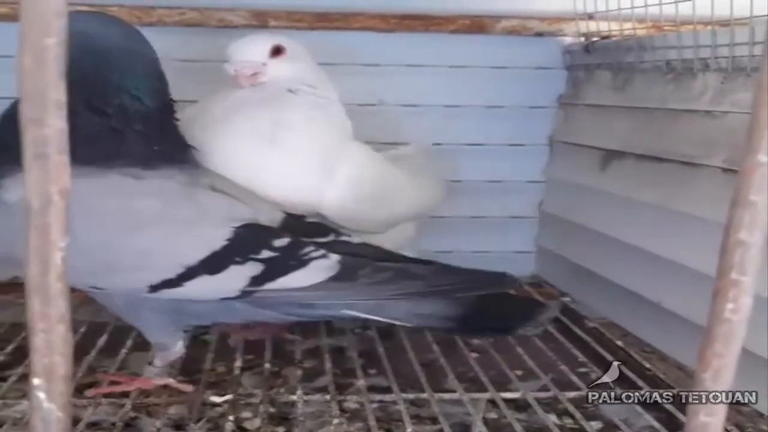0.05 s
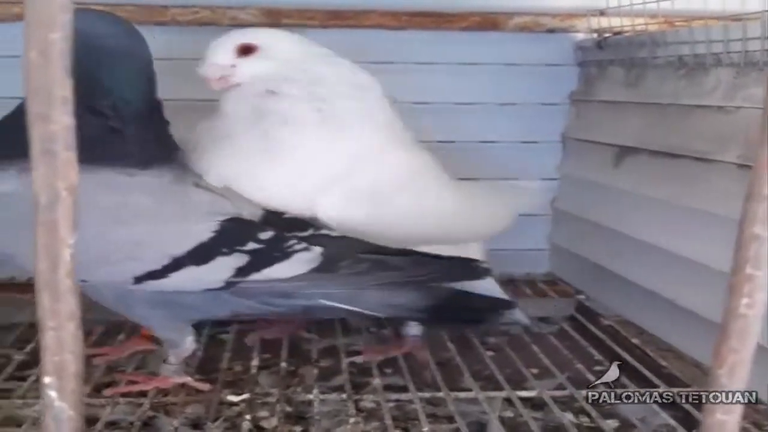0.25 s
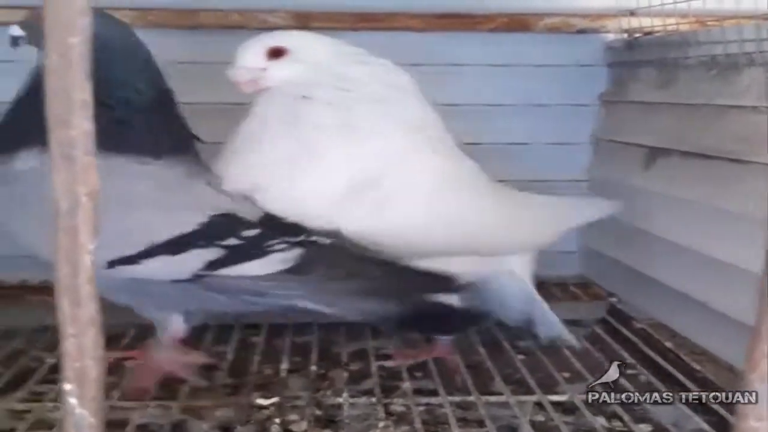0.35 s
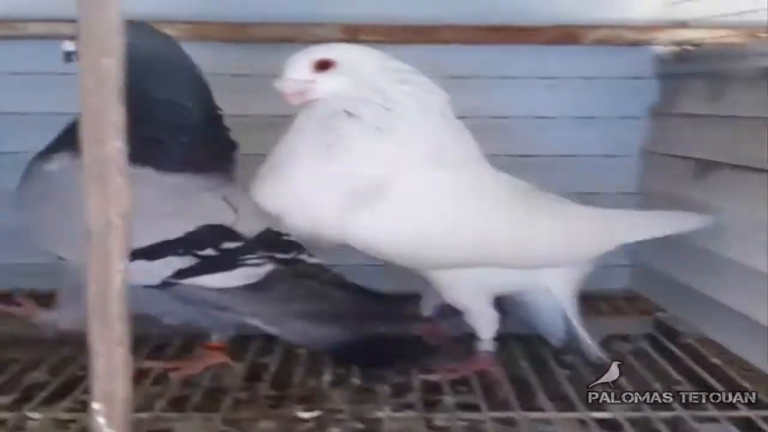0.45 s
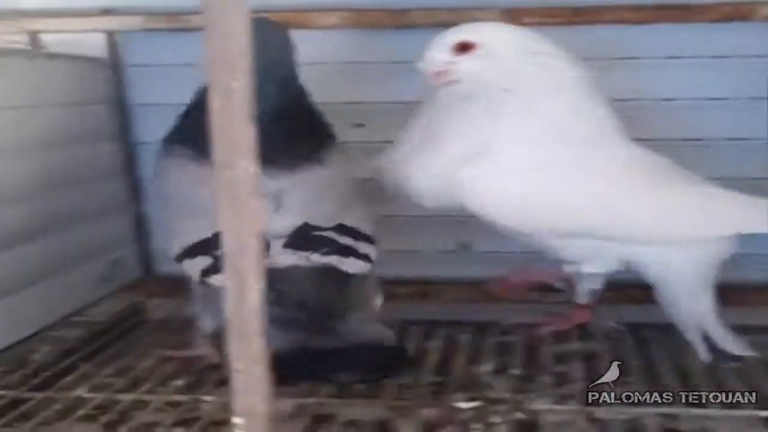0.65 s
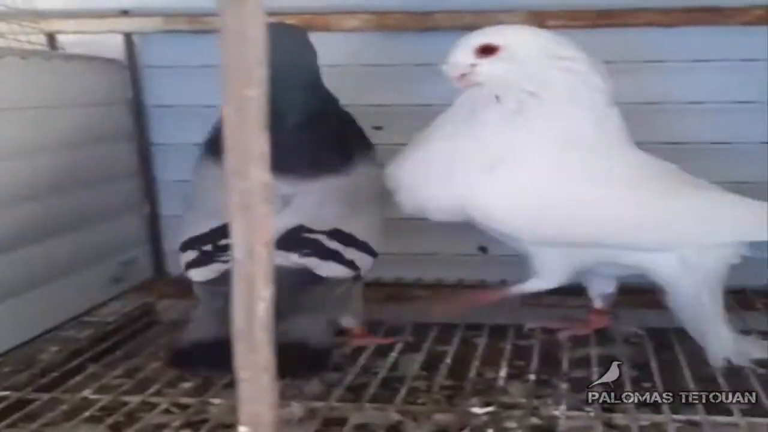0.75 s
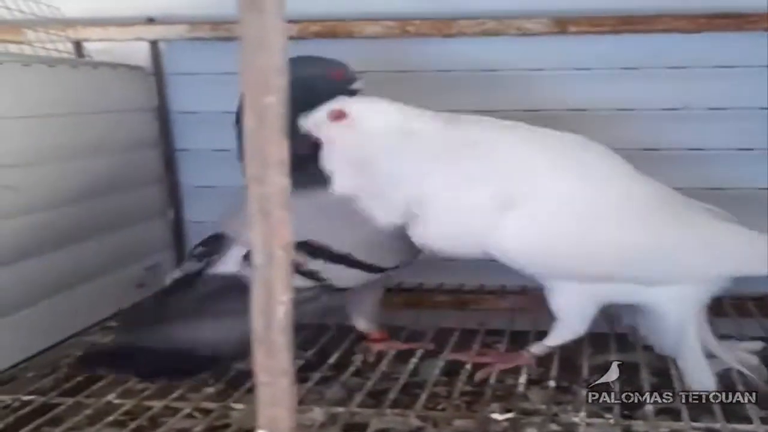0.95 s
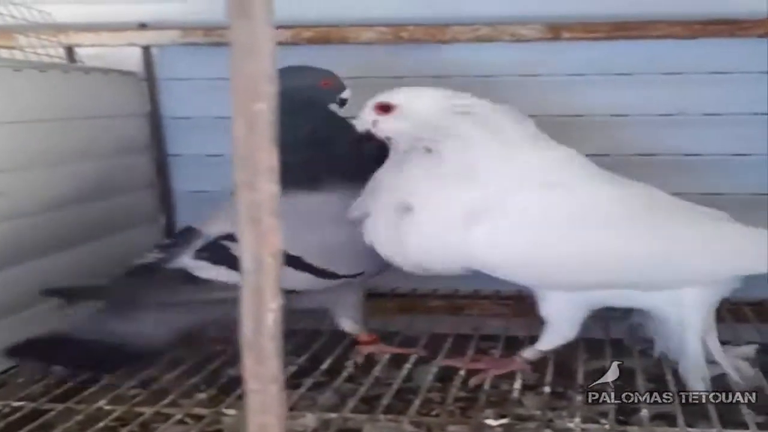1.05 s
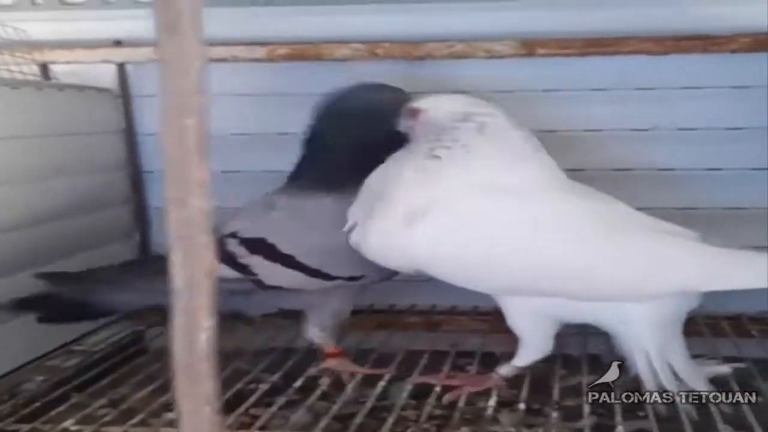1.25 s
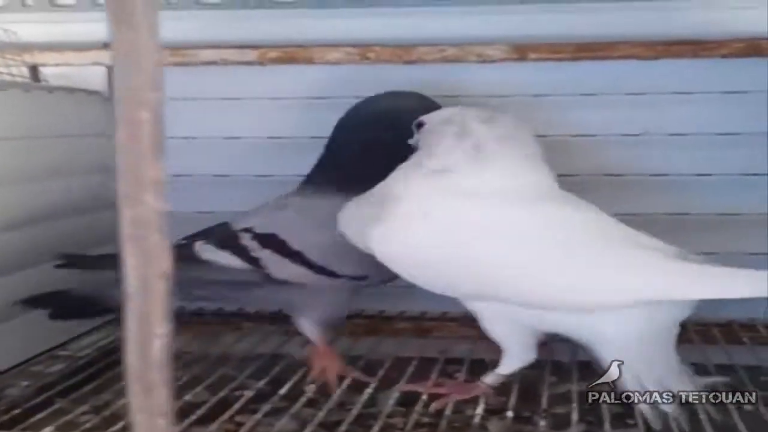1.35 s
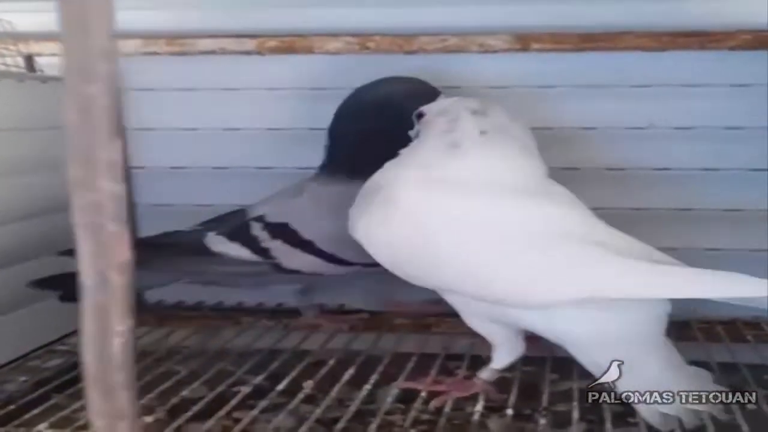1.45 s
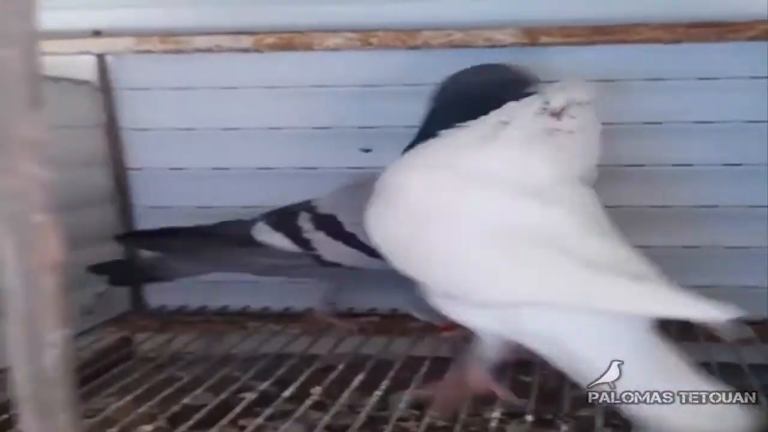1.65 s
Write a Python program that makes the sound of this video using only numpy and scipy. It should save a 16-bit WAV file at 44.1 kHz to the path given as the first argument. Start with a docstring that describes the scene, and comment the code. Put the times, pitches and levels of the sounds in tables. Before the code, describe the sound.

Pigeons shuffle on the grate floor of a small cage, close to the microphone. A quick cluster of dull thuds with faint claw ticks comes first, then a few softer steps. Faint coos and chirps lie farther off.

```python
"""Dull, quickly damped thuds, close to the microphone: two pigeons shuffling on the grate floor of a
small cage, in mono. Each foot pushes the grate down and lets it spring back, with a faint claw tick;
the grate goes on trembling under the busiest steps. A thin high buzz is heard along with the thuds.
Behind the cage lie a muffled rumble and a weak hiss, with faint low coos farther off and small birds
chirping in the distance."""
import sys
import numpy as np
from scipy import signal
from scipy.fft import rfft, irfft
from scipy.io import wavfile

SR = 44100
rng = np.random.default_rng(int(sys.argv[2]) if len(sys.argv) > 2 else 0)


def file_out(sig):
    """Save sig as 16-bit WAV at sys.argv[1]."""
    # one column per channel
    cols = np.atleast_2d(sig).T
    # limit, then scale
    lim = np.clip(cols, -1, 1)
    pcm = np.round(lim * 32767).astype(np.int16)
    wavfile.write(sys.argv[1], SR, pcm)


N = 74970
TIME = np.arange(N) / SR


def from_db(db):
    """Decibels to gain."""
    return 10 ** (np.asarray(db) / 20)


def unit_rms(x):
    """Scale to unit rms."""
    return x / np.sqrt(np.mean(x ** 2) + 1e-20)


def low_pass(x, hz, order):
    """Butterworth low-pass."""
    return signal.sosfilt(signal.butter(order, hz, fs=SR, output="sos"), x + 1e-18)


def high_pass(x, hz, order):
    """Butterworth high-pass."""
    return signal.sosfilt(signal.butter(order, hz, "high", fs=SR, output="sos"), x)


def coloured_noise(spectrum):
    """Unit-rms noise shaped by (frequency_hz, level_db) points, falling steeply beyond their ends."""
    hz, db = np.transpose(spectrum)
    bin_hz = np.maximum(np.fft.rfftfreq(N, 1 / SR), 1)
    skirts = np.minimum(1, np.minimum(bin_hz / hz[0], hz[-1] / bin_hz)) ** 6
    colour = from_db(np.interp(np.log(bin_hz), np.log(hz), db))
    return unit_rms(irfft(rfft(rng.standard_normal(N)) * skirts * colour, N))


def wavering_tone(hz, width_hz, rate_hz):
    """Unit-rms sine whose pitch wanders at random."""
    waver = unit_rms(low_pass(rng.standard_normal(N), rate_hz, order=2))
    return np.sqrt(2) * np.sin(2 * np.pi * np.cumsum(hz + width_hz * waver) / SR)


def mode(t, hz, db, t60_s):
    """A struck sine that falls 60 dB in t60_s."""
    return from_db(db - 60 * t / t60_s) * np.sin(2 * np.pi * hz * t)


def add(out, start_s, sound):
    """Mix a sound in at start_s."""
    start = int(np.clip(start_s * SR, 0, N - 1))
    out[start:start + len(sound)] += sound[:N - start]


# Spectra of the rumble and the hiss around the cage: frequency_hz, relative_db
RUMBLE_SPECTRUM = [(18, -25.5), (30, 4), (86, -4.5), (160, -10.5), (185, -13), (234, -14), (292, -15),
                   (353, -15), (548, -37.5), (616, -45.5), (1000, -51.5), (1300, -105), (2200, -120)]
HISS_SPECTRUM = [(530, -38), (900, -7.5), (1020, 1), (1190, 0), (1880, -1), (2030, -1.5), (3150, 0),
                 (4300, -0.5), (8410, -4), (13000, -3.5)]

def ambience():
    """The steady sound of the place: a muffled rumble and a weak hiss."""
    rumble = from_db(-47.5) * coloured_noise(RUMBLE_SPECTRUM)
    hiss = from_db(-78.5) * coloured_noise(HISS_SPECTRUM)
    return rumble + hiss


# Small birds far from the microphone: start_s, length_s, pitch_hz, level_db
CHIRP_NOTES = [(0.026, 0.018, 6120, -77), (0.072, 0.026, 3600, -81), (0.256, 0.029, 6200, -82),
               (0.587, 0.2, 4400, -88), (0.693, 0.049, 3420, -80.5), (0.971, 0.05, 4300, -82.5),
               (1.661, 0.12, 6500, -73)]

def distant_chirps():
    """Tiny high notes swell and fade, barely above the hiss."""
    out = np.zeros(N)
    for start_s, length_s, pitch_hz, level_db in CHIRP_NOTES:
        swell = np.sin(np.pi * np.clip((TIME - start_s) / length_s, 0, 1))
        out += from_db(level_db) * swell * wavering_tone(pitch_hz, width_hz=92.4, rate_hz=540)
    return out


# Pigeons some way behind the cage: start_s, length_s, pitch_hz, level_db
COO_NOTES = [(.0, 0.15, 355, -61), (0.813, 0.057, 355, -56), (0.922, 0.18, 300, -56.5),
             (1.064, 0.077, 369, -60), (1.553, 0.119, 280, -50.5), (1.558, 0.074, 405, -51.5),
             (1.563, 0.31, 453, -62)]

def faint_coos(fade_s=0.016):
    """Pigeons farther off call in soft, low, wavering tones."""
    out = np.zeros(N)
    for start_s, length_s, pitch_hz, level_db in COO_NOTES:
        swell = np.clip(np.minimum(TIME - start_s, start_s + length_s - TIME) / fade_s, 0, 1)
        out += from_db(level_db) * swell * wavering_tone(pitch_hz, width_hz=11.9, rate_hz=36.3)
    return out


# Bands of a thin high buzz: centre_hz, gain_db
BUZZ_BANDS = [(3892, -30.5), (7790, -36.5), (11697, -39.5)]

def thin_high_buzz(low_sound):
    """Three faint high bands that flutter along with the thuds and trembling."""
    flutter = high_pass(low_sound, hz=770, order=1)
    tones = sum(from_db(db) * np.sin(2 * np.pi * (hz * TIME + rng.random())) for hz, db in BUZZ_BANDS)
    return flutter * tones


# Strength of the cage floor's trembling: time_s, level_db
TREMBLE_LEVELS = [(0, -79.5), (.24, -65), (.262, -38.5), (.32, -41), (.38, -38.5), (.41, -46.5), (.45, -32),
                  (.50, -43.5), (.57, -43.5), (.68, -51.5), (.80, -62), (1.7, -49.5)]
# Its spectrum: frequency_hz, relative_db
TREMBLE_SPECTRUM = [(32, -31), (55, 1), (133, 8), (213, -6), (369, -18), (553, -34), (800, -45.5),
                    (1040, -85.5), (1760, -120)]

def grate_tremble():
    """The grate shudders between the quick steps."""
    level_db = np.interp(TIME, *np.transpose(TREMBLE_LEVELS))
    return from_db(level_db) * coloured_noise(TREMBLE_SPECTRUM)


# Faint ring of a bar under a claw: pitch_hz, level_db, t60_s
BAR_RING_MODES = [(940, -55, 0.044), (1187, -59.5, 0.046), (1384, -64.5, 0.062), (1750, -62.5, .045)]

def claw(t, scuff_db, tick_db, tick_decay_s=0.002, scuff_decay_s=0.0065):
    """A claw meets a bar: a tiny tick, and a short dull scuff that rings faintly."""
    ring = sum(mode(t, hz, db + rng.normal(0, 1.0), t60_s) for hz, db, t60_s in BAR_RING_MODES)
    tick = from_db(-68.5) * rng.standard_normal(len(t)) * np.exp(-t / tick_decay_s)
    dull_noise = unit_rms(low_pass(rng.standard_normal(len(t)), hz=583, order=4))
    scuff = from_db(-38.5) * dull_noise * np.exp(-t / scuff_decay_s)
    return from_db(tick_db) * tick + from_db(scuff_db) * (scuff + ring)


# The bar that the toe meets first: pitch_hz, level_db, t60_s
BAR_KNOCK_MODE = (366.5, 0, 0.011)

def toe_knock(t, cutoff_hz):
    """A toe strikes one bar with a brief, muffled knock."""
    return low_pass(mode(t, *BAR_KNOCK_MODE), cutoff_hz, order=7)


# The cage floor, damped by the birds' weight, at a pitch_ratio of 1: pitch_hz, level_db, t60_s
GRATE_MODES = [(90.1, 3, 0.058), (138, -10.5, 0.073), (195.5, -6.5, 0.026), (280.6, -10.5, 0.039)]

def thud(t, pitch_ratio, cutoff_hz):
    """The soft pad of a foot pushes the grate down; it springs back and settles."""
    motion = -sum(mode(t, hz * pitch_ratio, db, t60_s / pitch_ratio) for hz, db, t60_s in GRATE_MODES)
    return low_pass(high_pass(motion, hz=47, order=1), cutoff_hz, order=7)


# Footfalls close to the microphone; toe_db is relative to level_db, the last two are gains on the claw:
# start_s, level_db, pitch_ratio, cutoff_hz, toe_db, scuff_db, tick_db
FOOTFALLS = [(0.2388, -16, 1.16, 380, -6, -10.5, -4), (0.26, -32, 2.7, 440, -10, -26.5, -29),
             (0.28, -32, 3, 379, 6.5, -23.5, -27.5), (0.324, -41.5, 1.3, 480, -6.5, -18.5, -30),
             (0.3458, -7, 1.06, 434, -2.5, 1.5, 16.5), (0.4315, -15, 0.98, 390, -3.5, -8.5, -0.5),
             (0.4549, -23.5, 0.86, 274, -17, -26, -33), (.5200, -24.5, 0.77, 293, -12.5, -37, -22),
             (0.531, -20, 1.06, 277, 0.5, -34, -17.5), (0.55, -33, 0.83, 259, -10, -33, -16),
             (0.589, -32, 0.84, 268, -17, -42, -33), (1.2573, -23, 1.21, 389, 9.5, -14, 7.5),
             (1.3077, -41.5, 0.8, 254, -12, -24, -28), (1.409, -44, 0.61, 226, -21, -38, -32),
             (1.427, -44, 0.63, 222, -10, -32, -24), (1.552, -44.5, 0.77, 284, -22, -27, -30),
             (1.6755, -28, 1.16, 244, 6, -34, -35)]

def footsteps(toe_lead_s=0.0026, claw_delay_s=0.0016):
    """The toe knocks a bar, the weight lands, the claw ticks; returns thuds and claw contacts."""
    thuds, claws = np.zeros(N), np.zeros(N)
    t = TIME[:SR // 4]
    for start_s, level_db, pitch_ratio, cutoff_hz, toe_db, scuff_db, tick_db in FOOTFALLS:
        add(thuds, start_s - toe_lead_s, from_db(level_db + toe_db) * toe_knock(t, cutoff_hz))
        add(thuds, start_s, from_db(level_db) * thud(t, pitch_ratio, cutoff_hz))
        add(claws, start_s + claw_delay_s, claw(t, scuff_db, tick_db))
    return thuds, claws


def scene():
    """One microphone close to the cage, with the other birds well behind it."""
    thuds, claws = footsteps()
    grate = thuds + grate_tremble()
    foreground = grate + thin_high_buzz(grate) + claws
    return (foreground + ambience() + faint_coos() + distant_chirps())[None]


def record(dry, low_cut_hz=28, high_cut_hz=13200):
    """The microphone loses the deepest bass; the top is cut steeply."""
    thinned = high_pass(dry, low_cut_hz, order=2)
    return signal.sosfilt(signal.ellip(10, .1, 70, high_cut_hz, fs=SR, output="sos"), thinned)


dry = scene()
out = record(dry)
file_out(out)
```